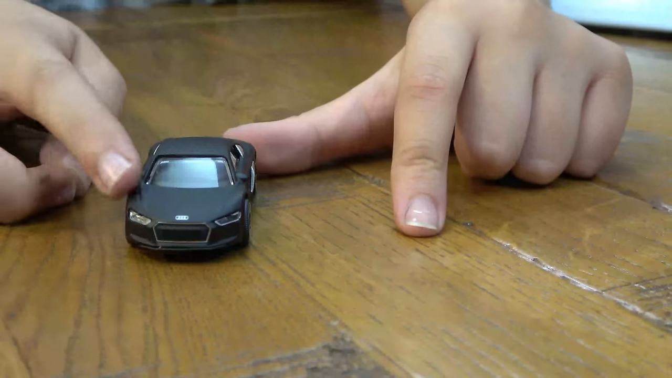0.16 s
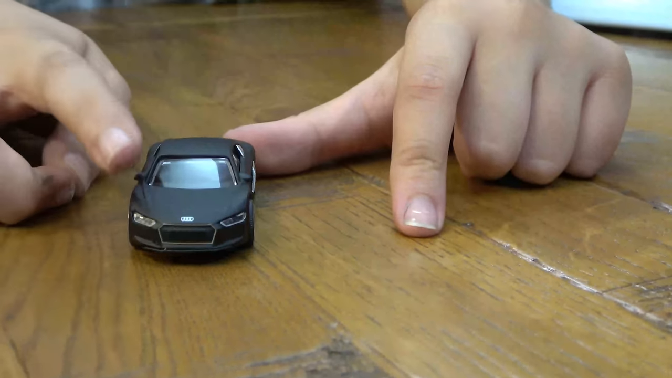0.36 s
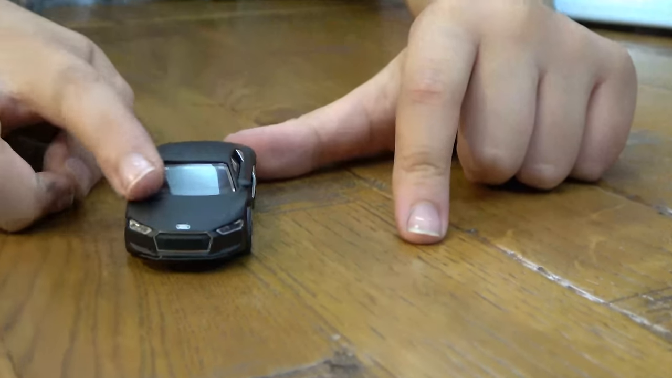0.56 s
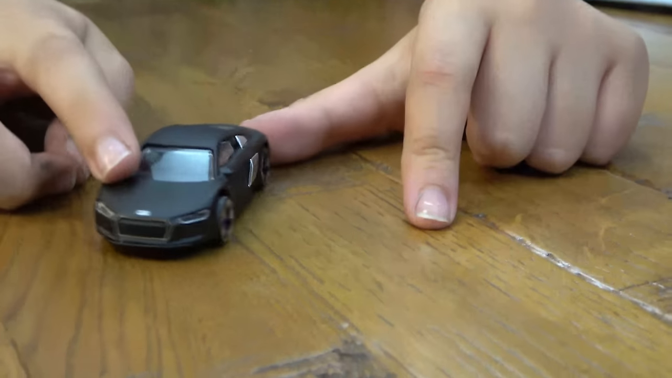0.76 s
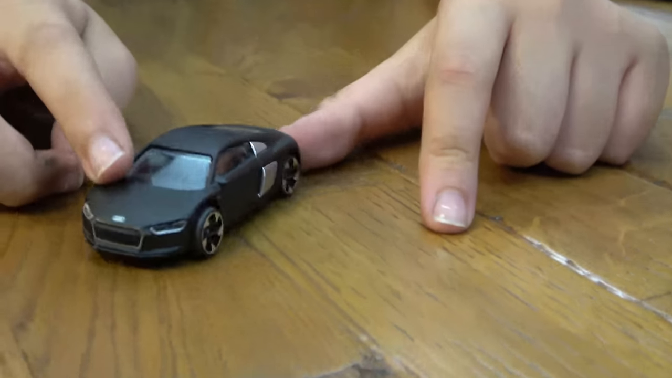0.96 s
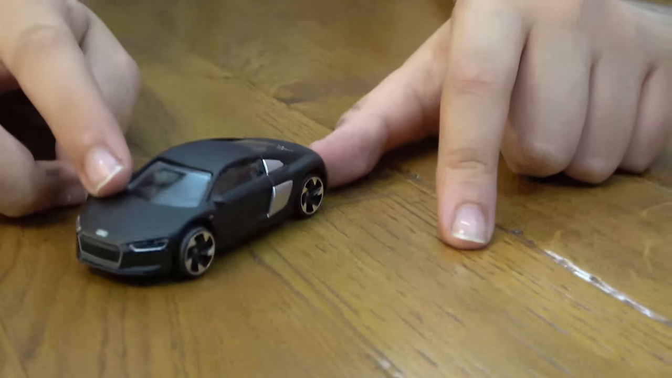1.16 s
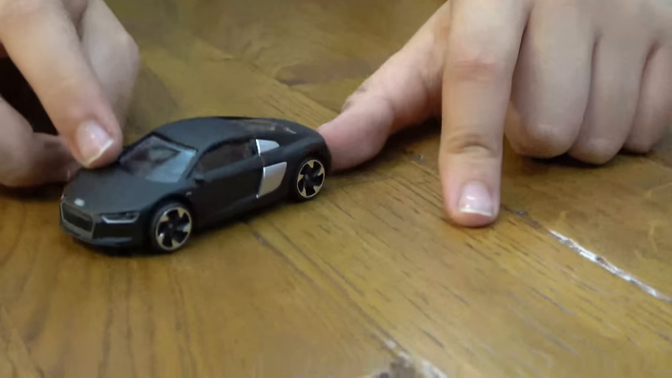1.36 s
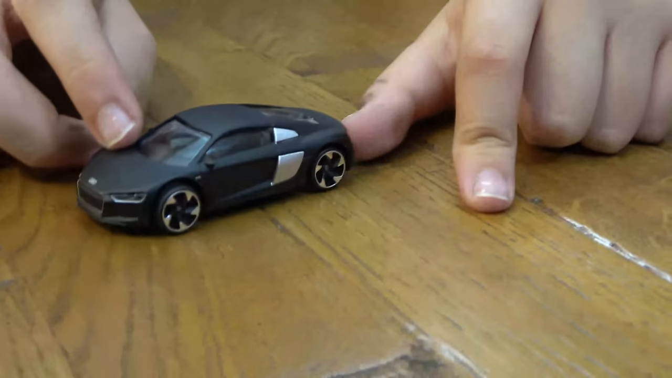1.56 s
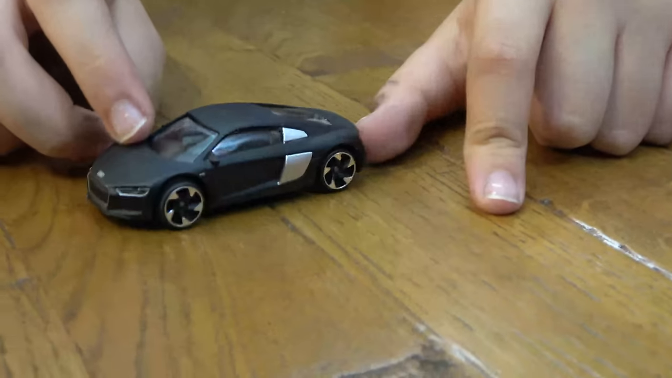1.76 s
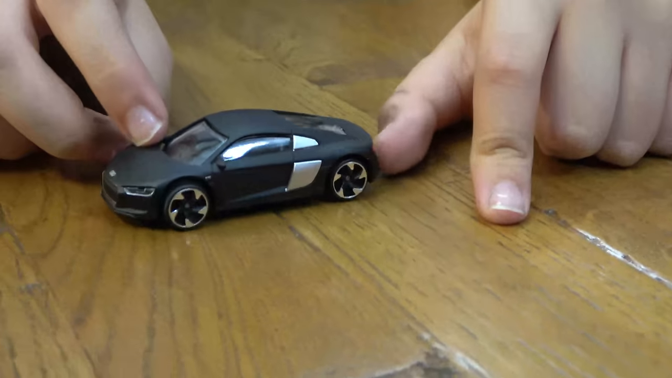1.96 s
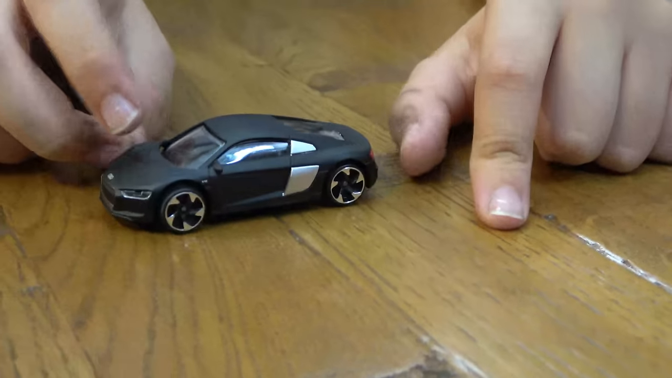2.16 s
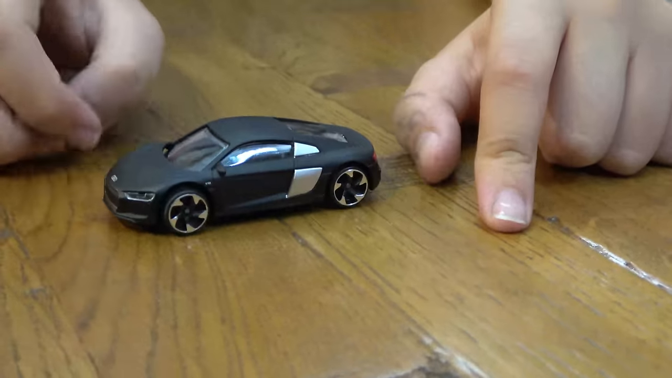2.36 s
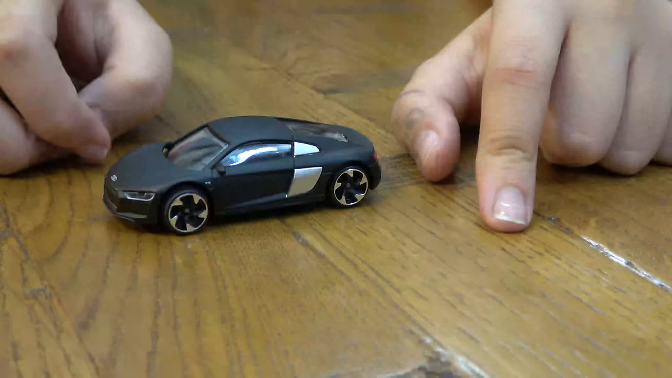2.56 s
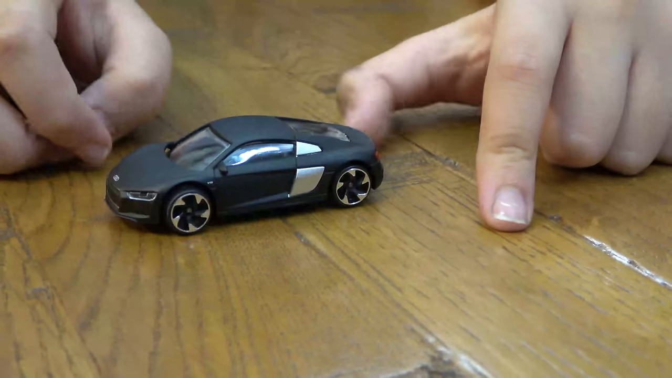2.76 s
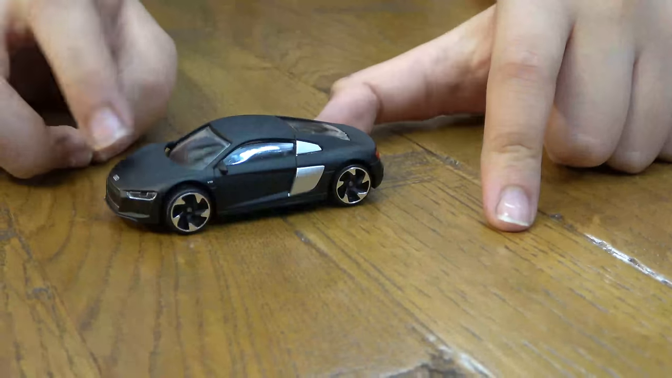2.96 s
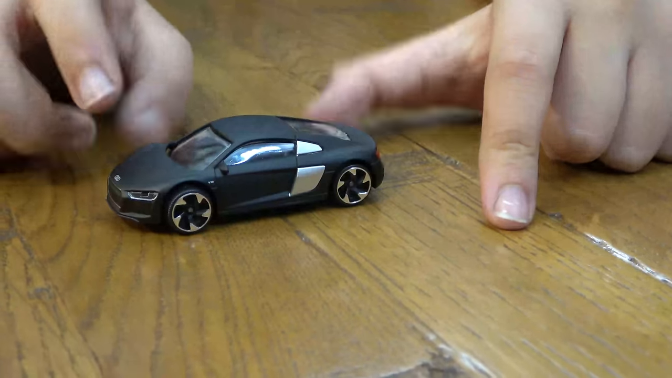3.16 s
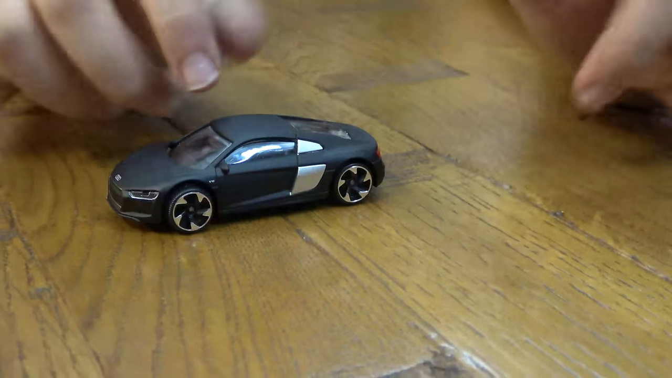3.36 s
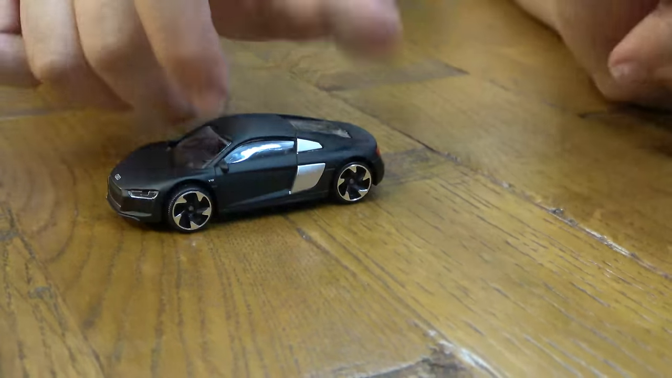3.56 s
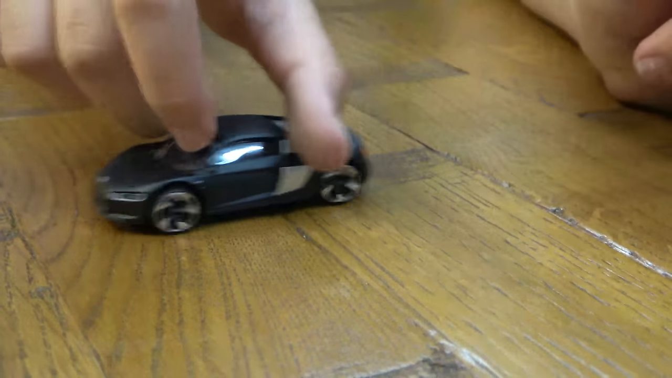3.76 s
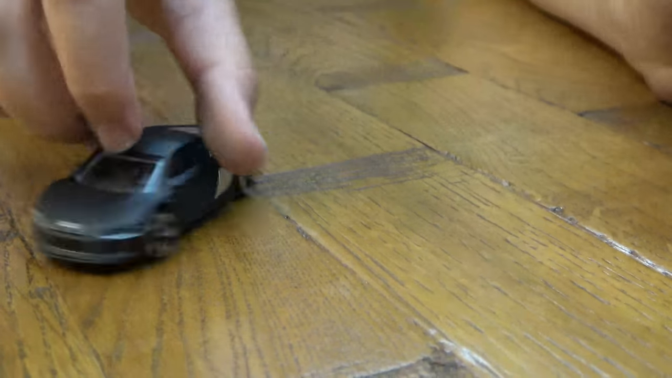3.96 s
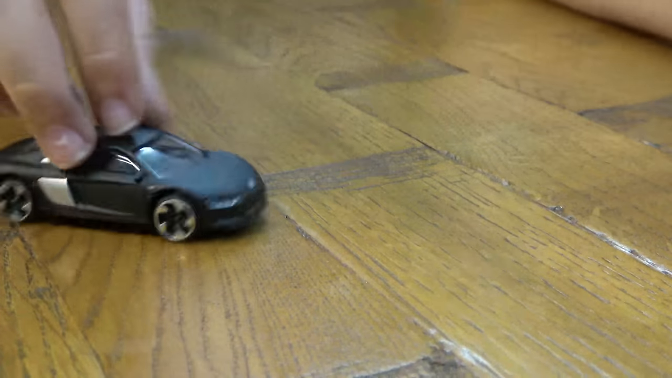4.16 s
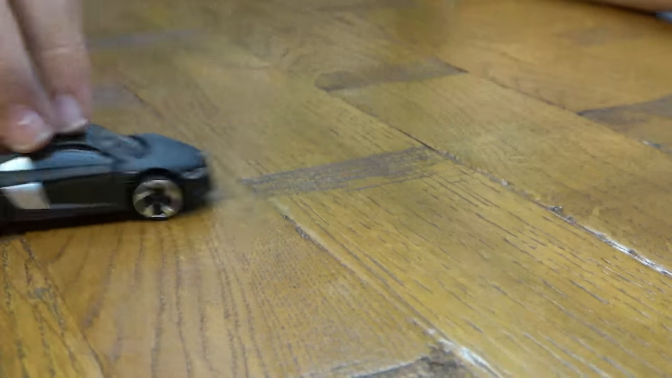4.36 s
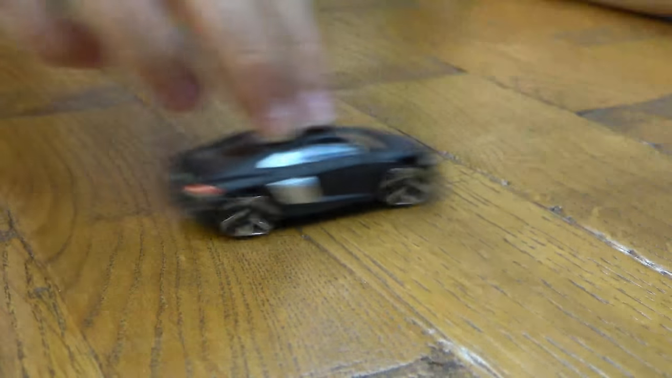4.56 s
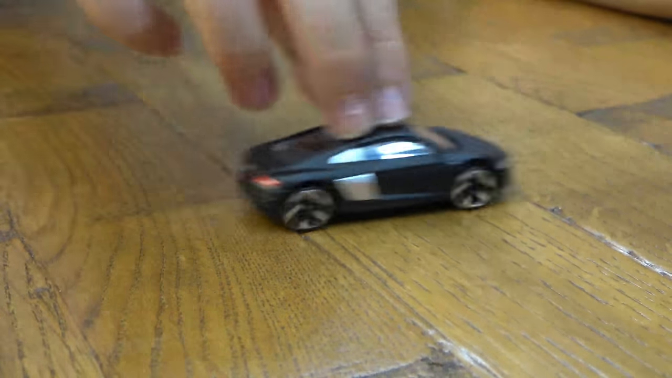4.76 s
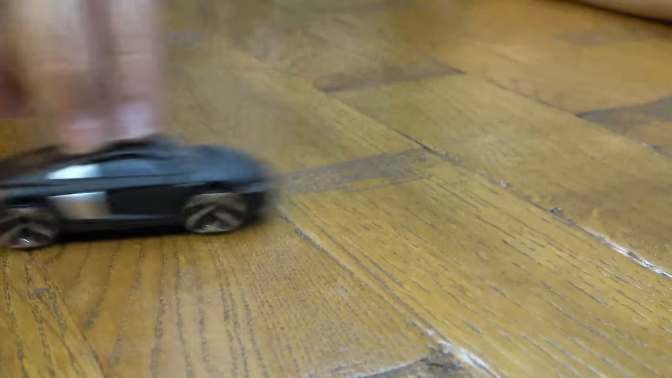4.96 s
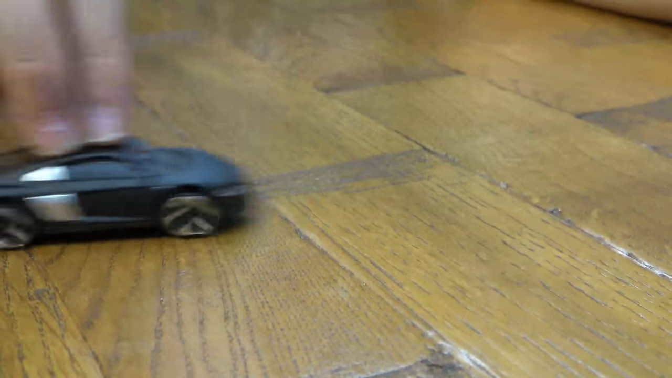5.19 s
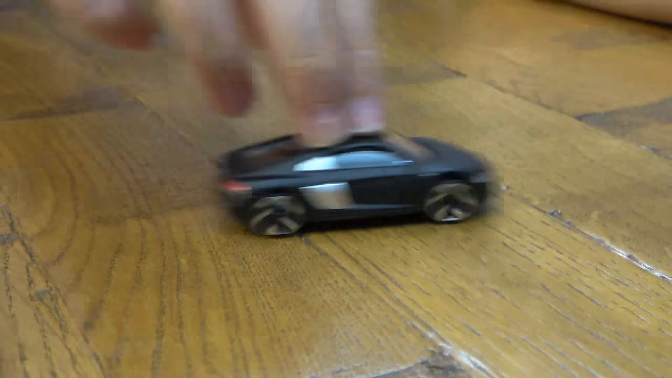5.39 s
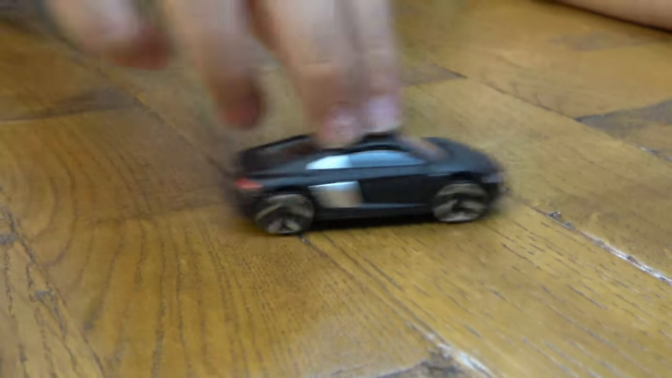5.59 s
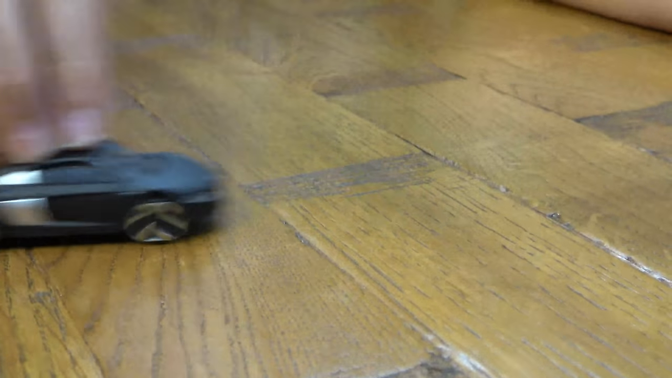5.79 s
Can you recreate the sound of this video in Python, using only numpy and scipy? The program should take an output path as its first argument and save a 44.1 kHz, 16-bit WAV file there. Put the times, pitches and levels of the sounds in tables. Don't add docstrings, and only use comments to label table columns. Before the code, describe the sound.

Quiet at first: loose axles click in a short cluster as a toy car is turned on floorboards, followed by very faint nail taps and finger rubs. Then the car is dragged round with a scrape and clatter, and rolled forward, back, forward, back in quick bright metallic rattling strokes over hollow wood. Near microphone, small dry room, low hiss.

```python
import sys
import numpy as np
from scipy import signal
from scipy.fft import rfft, irfft
from scipy.io import wavfile
from scipy.ndimage import uniform_filter1d

SR = 44100
rng = np.random.default_rng(int(sys.argv[2]) if len(sys.argv) > 2 else 0)


def persist_wave(psi):
    counts = np.round(np.clip(psi, -1, 1) * 32767).astype(np.int16)
    wavfile.write(sys.argv[1], SR, np.atleast_2d(counts).T)


def gain_from_db(level_db):
    decades = np.asarray(level_db, float) / 20
    return 10 ** decades


N = 257103


def unit(x):
    return x / np.sqrt(np.mean(x ** 2))


def colour(x, table, gain=0.95):
    hz = np.arange(x.shape[-1] // 2 + 1) * SR / x.shape[-1] + 1
    at, db = np.transpose(table)
    weight = gain_from_db(gain * np.interp(np.log(hz), np.log(at), db))
    return irfft(rfft(x) * weight, x.shape[-1])


def band(x, lo_hz, hi_hz):
    return signal.sosfilt(signal.butter(2, [lo_hz, hi_hz], "band", fs=SR, output="sos"), x)


def resonance(x, hz, width):
    return signal.lfilter(*signal.iirpeak(hz, hz / width, SR), x)


def steep_resonance(x, hz, width):
    return resonance(resonance(x, hz, width), hz, 2 * width)


def follow(x, settle_s):
    step = 1 / (settle_s * SR)
    return signal.lfilter([step], [1, step - 1], np.abs(x))


def walk(rate):
    k = int(SR / rate)
    levels = rng.standard_normal(N // 20 + 1)[:N // k + 1]
    return unit(uniform_filter1d(np.repeat(levels, k), k)[:N])


def grains(rate, spread_db, burst_s):
    when, size = rng.random((2, N))
    strength = (when < rate / SR) * gain_from_db(-spread_db * np.log(size + .03))
    envelope = signal.lfilter([1], [1, -np.exp(-1 / (burst_s * SR))], strength)
    return unit(envelope * rng.standard_normal(N))


# pitch_hz, width_hz, level_db
HUM = [(46.3, 2.1, -78), (124.6, 7.1, -75.5), (636, 115, -74.5), (754, 61, -79.5), (1004, 38, -78.5),
       (1242, 43, -85)]
# pitch_hz, level_db (per Hz)
AIR = [(20, -46), (35, -5), (60, -8), (150, -10), (300, -14), (450, -14), (900, -14.5), (1400, -25.5),
       (3100, -28.5), (4250, -34.5), (6400, -31), (16000, -37)]
# pitch_hz, level_db (per Hz)
AIR_SIDE = [(15, -56), (25, -16), (130, -3), (170, -6), (641, -5), (2050, -19.5), (4490, -24.5),
            (6050, -15), (16000, -27.5)]


def air():
    hum = np.zeros(N)
    for hz, width, db in HUM:
        hum += gain_from_db(db + 2.2 * walk(4)) * unit(steep_resonance(rng.standard_normal(N), hz, width))
    mid = hum + gain_from_db(-69.5) * unit(colour(rng.standard_normal(N), AIR))
    side = gain_from_db(-78.5) * unit(colour(rng.standard_normal(N), AIR_SIDE))
    return np.array([mid + side, mid - side])


# start_s, stop_s, level_db
LEANING = [
    (0.19, 0.636, -73),
    (1.752, 2.071, -79),
    (2.25, 3.624, -76),
    (3.67, 3.73, -72),
]


def hands():
    t = np.arange(N) / SR
    load = sum(gain_from_db(db) * (t > start_s) * (t < stop_s) for start_s, stop_s, db in LEANING)
    return uniform_filter1d(load, size=1500)


# pitch_hz, width_hz
AXLES = [(1660, 110), (2100, 15), (2640, 76), (3050, 800), (3490, 290), (4200, 46)]


def knocks(table, crack_s, shake_s, ring_db, main_db, low_hz, top_hz, level_db, crack_db, contact_s, shake=0.35):
    size = 2048
    out, t = np.zeros(N + size), np.arange(size) / SR
    for s, db, main_hz, bright_db in table:
        noise, chance = rng.standard_normal(size), rng.standard_normal(len(AXLES))
        fall = np.exp(-t / crack_s)
        snap = (1 - np.exp(-t / .0003)) * noise * (fall + 0.1 * np.exp(-t / shake_s))
        shaking = shake * np.exp(-(t / shake_s) ** (1 + shake))
        blow = (1 - np.exp(-t / contact_s)) * noise * (fall + shaking)

        ring = gain_from_db(main_db) * unit(resonance(blow, main_hz, main_hz / 18))
        for c, (hz, width) in zip(chance, AXLES):
            ring = ring + gain_from_db(3 * c) * unit(resonance(blow, hz, width))
        body = unit(blow) + gain_from_db(ring_db) * ring
        crack = band(band(snap, low_hz, top_hz), 2000, 1.2 * top_hz)
        parts = band(body, 1300, 2800), band(body, 2800, 5500), crack

        tilt_db = 15.5 * np.log2(main_hz / 2950)
        parts_db = min(-tilt_db, 0), min(tilt_db, 0), bright_db + crack_db
        i = int(s * SR)
        for part, part_db in zip(parts, parts_db):
            out[i:i + size] += gain_from_db(db + level_db + part_db) * part / np.abs(part).max()
    return out[:N]


# start_s, level_db
# (peak), pitch_hz (main mode), crack_db
TICKS = [(.558, -54.5, 3600, -24), (.6595, -45.5, 3400, 2.5), (.6713, -34, 4200, -0.5),
         (.7084, -48, 3000, -30), (.7631, -33.5, 4360, -15), (.7755, -48, 4660, -8), (.7973, -34, 4160, -1),
         (.8303, -39, 2100, -14), (.8365, -41, 2110, -2), (.8486, -33, 4450, -25), (.8636, -29, 4260, -25),
         (.868, -34, 2140, -5), (.8755, -42, 2200, -25), (.9088, -40, 1823, -13), (.918, -36.5, 4080, -25),
         (.9255, -41, 2100, -21), (.9372, -37.5, 4170, -8), (1.0437, -41.5, 1970, -34),
         (1.055, -49, 2030, -18), (1.0585, -34.5, 2060, -8), (1.0615, -29.5, 2090, -11),
         (1.0795, -41, 2970, -26), (1.268, -41, 3400, -28), (1.2865, -39.5, 3480, -23),
         (1.4306, -41.5, 3720, -3), (1.4367, -42.5, 3900, -6), (1.4432, -60, 3580, -19),
         (1.4567, -46.5, 3630, 2), (.2034, -49.5, 3420, -6)]


def axle_ticks():
    return knocks(TICKS, crack_s=.0005, shake_s=.003, ring_db=-16, main_db=7, low_hz=3400, top_hz=8000,
                  level_db=-1, crack_db=7, contact_s=.0003)


def room(x):
    t, t60_s = np.arange(16384) / SR, 0.21
    tails = rng.standard_normal((2, len(t))) * np.exp(-np.log(1000) * t / t60_s) * (t > .002)
    mid, side = (signal.fftconvolve(x, tail / np.sqrt(np.sum(tail ** 2)))[:N] for tail in tails)
    mid = colour(mid, [(200, 7), (1000, 0.0), (4500, -2.5), (14000, -14)])
    side = colour(side, [(250, -8), (600, -5.0), (2000, -22), (4500, -18.5), (7000, -4.0), (14000, -12.0)])
    return gain_from_db(-5) * (mid + gain_from_db(-1) * side * np.array([[1], [-1]]))


# start_s (fullest), fade_s, level_db, pitch_hz (centre), width_octaves
BRUSHES = [(.24, 0.02, -70, 2000, 1.4), (0.39, .04, -70, 1290, 1.4), (2.435, 0.033, -63.5, 1860, 1.45),
           (2.6, 0.025, -71, 1800, 2.7), (3.448, 0.026, -58.5, 1800, 6), (3.49, 0.034, -61, 1640, 4.2),
           (3.725, 0.025, -68, 3600, 0.9), (3.22, 0.095, -67.5, 470, 1.5), (2.83, 0.035, -71, 2000, 1.3),
           (1.17, .03, -66, 2100, 2.8), (1.62, 0.1, -76, 2600, 1.2), (2.045, 0.025, -76, 3000, 0.9),
           (0.885, 0.025, -51, 2100, 0.064)]
FLICKS = [
    (2.21, 0.094, -72.5, 4300, 0.89),
    (2.21, 0.088, -72.5, 8600, 0.36),
    (2.878, 0.078, -55, 1514, 2.34),
    (2.886, 0.024, -57, 4500, 0.95),
    (2.966, 0.034, -55, 4240, .34),
    (2.97, 0.034, -66, 8200, 0.12),
    (3.173, 0.17, -76.5, 9000, 2.5),
    (3.691, 0.011, -58, 586, 0.43),
    (2.932, 0.014, -63, 287, 0.64),
    (3.36, 0.0034, -59.5, 9600, 0.6),
]


def fingers():
    out, t = np.zeros(N), np.arange(N) / SR
    rub = grains(rate=2000, spread_db=2.5, burst_s=0.0015)
    rows = [(row[1], *row) for row in BRUSHES]
    rows += [(0.006, *row) for row in FLICKS]
    for rise_s, s, fade_s, db, hz, octaves in rows:
        near = slice(int((s - .15) * SR), int((s + .3) * SR))
        since = t[near] - s
        swell = np.where(since < 0, np.exp(-(since / rise_s) ** 2), np.exp(-since / fade_s))
        half = 2 ** (octaves / 2)
        out[near] += gain_from_db(db) * swell * unit(band(rub[near], hz / half, min(hz * half, .4 * SR)))
    return out


# pitch_hz, width_hz, level_db
BOARDS = [(72, 25, -15.5), (110, 31, -8), (134.7, 26, -2), (172.3, 16.5, 3), (202, 31, -2.5), (257, 16, -2),
          (289.6, 16, -6.5), (335, 4.7, -5), (428, 15, -10), (606, 90, -20.5)]
# start_s, pitch_hz, level_db, ring_s
THUMPS = [
    (.23, 183, -56, 0.15),
    (.83, 166, -39, 0.12),
    (.905, 153, -35, 0.073),
    (2.03, 142, -55.5, 0.15),
    (4.29, 145, -40.5, 0.32),
    (4.335, 250, -51, 0.11),
    (4.505, 85.6, -48, .15),
    (4.54, 146, -30, 0.095),
    (4.82, 162, -36.5, 0.097),
]


def boards(drive):
    def ring(x):
        return sum(gain_from_db(db) * steep_resonance(x, hz, width) for hz, width, db in BOARDS)

    push = grains(rate=300, spread_db=3.0, burst_s=0.0046)
    out = band(ring(drive * push) / np.std(ring(push)), 60, 900)
    for s, hz, db, ring_s in THUMPS:
        t = np.maximum(np.arange(N) / SR - s, 0)
        swell = (1 - np.exp(-t / 0.0094)) * np.exp(-np.log(10) * (t / ring_s) ** 2 * 10)
        out += gain_from_db(db) * np.sin(2 * np.pi * hz * t) * swell
    return out


def pushes(table, bright_db):
    t, out = np.arange(N) / SR, np.zeros((3, N))
    for start_s, fastest_s, stop_s, chatter_db, drum_db in table:
        speed = np.sin(np.pi / 2 * np.interp(t, [start_s, fastest_s, stop_s], [0, 1, 0]))
        chatter = gain_from_db(chatter_db) * speed ** 1.67
        out += [chatter, chatter * gain_from_db(bright_db) * speed ** 0.93, gain_from_db(drum_db) * speed ** 0.74]
    return out


# start_s, fastest_s, stop_s, level_db (chatter), drum_db
NUDGE = [
    (.62, .68, 0.87, -62, -61.5),
    (.74, .88, 1.014, -55, -55),
    (1.0, 1.066, 1.16, -59.5, -66),
    (1.16, 1.2, 1.49, -77, -67.5),
    (1.23, 1.29, 1.456, -73, -70),
    (1.41, 1.444, 1.545, -61.5, -66.5),
]


def nudges():
    return pushes(NUDGE, bright_db=-9)


# pitch_hz, width_hz, level_db
SHELL = [(1692, 46, -2), (2100, 48, 8.5), (2760, 160, -8.5), (3050, 1300, -0.5), (4200, 260, 0),
         (4200, 16, 2), (5660, 470, 1.5), (6800, 220, 9.5)]


def shell(x, direct):
    return direct * x + sum(gain_from_db(db) * resonance(x, hz, width) for hz, width, db in SHELL)


# pitch_hz, level_db (per Hz)
CHATTER = [(250, -69), (500, -17), (1100, -15), (1650, -11), (2100, -9), (3000, -3.5), (4200, -10.5),
           (5100, -15.5), (6500, -25.5), (9000, -64), (16000, -49)]
# pitch_hz, level_db (per Hz)
BRIGHT = [(2500, -70), (4200, -28), (6000, -3), (8500, -8), (11000, -14), (14000, -23), (17000, -30)]


def wheels():
    kicks = grains(rate=2500, spread_db=1.9, burst_s=.0015)
    sharp = grains(rate=400, spread_db=3.6, burst_s=.0008)
    chatter = unit(colour(shell(kicks, direct=0.5), CHATTER))
    bright = unit(colour(0.63 * kicks + sharp, BRIGHT))
    level, edge, drum = rolls() + nudges()
    skid, skid_edge, skid_drum = skids()
    creep = gain_from_db(-58.5) * (np.arange(N) / SR > 3.79)
    uneven = gain_from_db(1.3 * walk(40))
    lumps = gain_from_db(2.2 * walk(25))
    rattle = uneven * ((level + creep) * chatter + (edge + 0.22 * creep) * bright)
    rub = skid * chatter + skid_edge * unit(band(bright, 2100, 8300))
    return rattle, rub, (drum + skid_drum) * lumps


# start_s, level_db (peak), pitch_hz (main mode), crack_db
PINGS = [(1.0654, -41, 3000, 2), (1.0792, -47, 3000, -8), (3.801, -42, 3000, 0), (3.9385, -43, 3000, 3),
         (3.9953, -34, 3000, 0), (4.0053, -32.5, 3000, 0.5), (4.0701, -37, 2970, 0), (4.212, -35, 3000, 0),
         (4.2966, -43, 3000, 4), (4.3314, -48, 3000, -2), (4.415, -30, 3000, -6), (4.4353, -18, 3000, 0),
         (4.604, -28, 3000, -1), (4.655, -24, 3000, 0), (4.8948, -29, 3000, 0), (5.2325, -34, 3000, 0),
         (5.3253, -20, 3000, 0), (5.4174, -30, 3000, 2), (5.616, -46, 3000, -5), (5.743, -29, 3000, 1)]


def axle_pings():
    return knocks(PINGS, crack_s=0.0006, shake_s=0.0042, ring_db=-5, main_db=1, low_hz=5450, top_hz=12300,
                  level_db=-12.5, crack_db=6, contact_s=0.00027)


# start_s, level_db (peak), pitch_hz (main mode), crack_db
TAPS = [(1.8497, -47.5, 3480, -20), (1.9365, -50.5, 3570, -19), (1.988, -56, 2680, -20),
        (2.018, -47, 3440, -16), (2.041, -57, 3650, -12), (2.207, -50, 4500, -20), (2.2905, -56, 1890, -9),
        (2.8777, -64, 2090, -12), (2.8838, -46, 1580, -21), (3.218, -51.5, 3350, -10),
        (3.295, -59, 2360, -15), (3.353, -49.5, 2980, -12), (3.6647, -49.5, 3500, -22),
        (3.6985, -44, 2660, -13), (1.4, -53, 2960, -18), (1.549, -59, 1970, -25), (1.593, -59, 3540, -25),
        (1.643, -66, 2800, -25), (2.458, -59, 2000, -20), (2.689, -66, 3000, -20), (2.847, -61, 2100, -20),
        (3.34, -55, 3000, -9), (3.677, -60, 4300, -7), (3.69, -64, 5000, -10)]


def nail_taps():
    return knocks(TAPS, crack_s=0.00033, shake_s=0.0082, ring_db=-15, main_db=16.5, low_hz=4500, top_hz=7600,
                  level_db=-3.5, crack_db=10, contact_s=0.00014)


# start_s, fastest_s, stop_s, level_db (chatter), drum_db
SKID = [
    (3.76, 3.85, 3.95, -51.5, -51.5),
    (3.86, 4.1, 4.328, -38.5, -50),
]


def skids():
    return pushes(SKID, bright_db=-11)


# start_s, level_db (peak), pitch_hz (main mode), crack_db
SWING = [(3.782, -38.5, 3570, -5.5), (3.7921, -46, 1830, -16), (3.8091, -31, 3430, -15),
         (3.8288, -37, 1750, -7), (3.8383, -35.5, 3020, -8), (3.8461, -34.5, 3010, -3.5),
         (3.8511, -35, 2900, -23), (3.8764, -41, 4170, -18), (3.883, -46, 2100, -19),
         (3.9006, -45, 2080, -22), (3.9209, -38, 2600, -23), (3.9372, -32, 2080, -20),
         (3.9608, -26, 3080, -27), (3.9704, -36, 2100, -19), (3.9773, -32, 2960, -22),
         (3.9842, -32, 2010, -26), (4.0205, -29, 2820, -14), (4.0303, -28, 3450, -25),
         (4.0684, -30, 2100, -22), (4.0943, -18, 2680, -28), (4.101, -25, 2700, -9),
         (4.1178, -25, 2600, -25), (4.1223, -26, 2990, -15), (4.1629, -35, 2870, -24),
         (4.1697, -39, 2840, -24), (4.1776, -44, 3080, -23), (4.1822, -38, 3410, -20),
         (4.214, -40, 3060, -20), (4.2257, -25, 3200, -17), (4.2409, -37, 2690, -11),
         (4.2568, -44, 2600, -22), (4.2715, -31, 3480, -20), (4.2783, -38, 2730, -21),
         (4.2869, -38, 1980, -21), (4.3067, -43, 3380, -27), (4.3161, -37, 2650, -17),
         (4.3433, -35.5, 3320, -14), (4.355, -59, 3290, -22), (4.3623, -59, 2630, -20),
         (4.3902, -45, 2160, -10)]


def swing_jolts():
    return knocks(SWING, crack_s=0.0006, shake_s=0.013, ring_db=-2.0, main_db=21.0, low_hz=4740, top_hz=9000,
                  level_db=-2.0, crack_db=8, contact_s=0.00028, shake=0.27)


# start_s, fastest_s, stop_s, level_db (chatter), drum_db
ROLL = [
    (4.38, 4.57, 4.763, -32.5, -46),
    (4.77, 4.95, 5.129, -36, -44.5),
    (5.14, 5.35, 5.537, -35, -42.5),
    (5.55, 5.75, 6.14, -38, -41.5),
]


def rolls():
    return pushes(ROLL, bright_db=-11.5)


# start_s, level_db (peak),
# pitch_hz (main mode), crack_db
RIDGES = [(4.4051, -42, 1970, -20), (4.4188, -29.5, 2010, -4.5), (4.4289, -28, 2300, -9),
          (4.4457, -21.5, 4200, -4), (4.4556, -23.5, 3120, -18.5), (4.463, -25, 1940, -7),
          (4.4722, -25.5, 2130, -9), (4.4916, -36, 2910, -20), (4.5054, -24, 2270, -23),
          (4.5103, -28, 1930, -22), (4.5278, -23, 2020, -8.5), (4.5354, -22.5, 2950, -7),
          (4.5505, -24, 2100, -18), (4.558, -20.5, 2690, -11), (4.568, -21, 3120, -21),
          (4.5808, -14.5, 2870, -14), (4.5877, -20.5, 2100, -26), (4.5987, -19.5, 4270, -26),
          (4.6129, -26, 3260, -15), (4.6309, -32, 3240, -9), (4.6473, -32, 4260, -25),
          (4.6635, -19, 3000, -13), (4.6707, -35, 2900, -26), (4.6899, -36, 3200, -14.5),
          (4.7349, -46, 4170, -23), (5.1505, -47, 2610, -16), (5.1578, -44, 3200, -17),
          (5.1715, -22, 3050, -19), (5.204, -35, 3240, -26), (5.2228, -24.5, 1870, -11.5),
          (5.2399, -26.5, 1950, -16), (5.2498, -32.5, 2060, -20), (5.2655, -21.5, 1840, -3.5),
          (5.2681, -32, 2026, -8.5), (5.3258, -22.5, 2840, -27), (5.3315, -21, 3130, -20),
          (5.3467, -17, 2120, -18), (5.3719, -30.5, 4130, -7), (5.3873, -28, 2070, -15),
          (5.4, -47, 3250, -22), (5.4096, -50, 2950, -18), (5.4228, -29.5, 2640, -10),
          (5.4507, -25.5, 2120, -12.5), (5.452, -24, 2100, -15), (5.4766, -19, 2420, -17.5),
          (5.5085, -36, 2180, -26), (5.5097, -41, 2270, -27), (5.5153, -27.5, 2730, -23),
          (5.5205, -35, 3230, -23), (5.536, -37, 2930, -22),
          (4.7816, -45, 4180, -18), (4.8013, -32, 2700, -30), (4.8157, -17, 3160, -18.5),
        (4.8298, -28, 2140, -11.5), (4.832, -27.5, 4130, -24), (4.8537, -38, 2680, -30),
        (4.856, -35, 3050, -15), (4.8657, -45, 3190, -30), (4.879, -26.5, 2680, -25),
        (4.8962, -22.5, 2780, -13), (4.9101, -32, 2073, -18), (4.9216, -22, 4020, -5.5),
        (4.9272, -33, 2820, -10), (4.9394, -28, 2140, -19), (4.9519, -19.5, 4090, -17),
        (4.9646, -36, 2380, -21), (4.9718, -21, 2760, -10), (4.983, -23, 3580, -23),
        (4.9983, -35, 2150, -20), (5.0077, -28, 3240, -1), (5.0122, -26, 1970, -28),
        (5.0371, -19.5, 2740, -14), (5.0475, -27, 3300, -10.5), (5.0721, -29, 3217, -15),
        (5.088, -36, 3740, -20), (5.1129, -41, 3280, -13), (5.567, -53, 4160, -19),
        (5.5795, -66, 2030, -23), (5.5867, -57, 1960, -23), (5.5935, -60, 2830, -26),
        (5.5983, -71, 3290, -17), (5.6033, -58, 2060, -30), (5.6243, -31, 4200, -17),
        (5.6318, -29.5, 2620, -10), (5.6482, -30.5, 2040, -10), (5.6628, -25, 2034, -30),
        (5.6782, -32, 2660, -17), (5.6828, -30, 2773, -26), (5.6913, -22.5, 2060, -21),
        (5.7014, -27, 2680, -29), (5.7186, -21, 2670, -26), (5.734, -23.5, 2160, -16),
        (5.749, -18.5, 4130, -10.5), (5.7573, -23.5, 2060, -14), (5.7684, -27, 2650, -8),
        (5.7776, -27, 4140, -12), (5.7888, -21, 3050, -17), (5.8035, -22.5, 2900, -25),
        (5.8128, -19, 3030, -4), (5.8184, -20, 1950, -25)]


def ridge_jolts():
    return knocks(RIDGES, crack_s=0.001, shake_s=0.0057, ring_db=7.0, main_db=22.5, low_hz=5300,
                  top_hz=11100, level_db=-3.5, crack_db=8.0, contact_s=0.00059, shake=.6)


# pitch_hz, level_db
LEAN = [(30, -1), (70, -4), (140, -3), (300, .4), (1300, -.3), (2400, -.7), (5000, .5), (15000, .1)]


def scene():
    rattle, rub, drum = wheels()
    load = drum + hands()
    hits = axle_ticks() + nail_taps() + swing_jolts() + ridge_jolts()
    kick = gain_from_db(-17) * follow(hits, settle_s=0.0043)
    shaken = follow(hits, settle_s=.0035) + gain_from_db(-61.5)
    bunched = shaken / uniform_filter1d(shaken, size=3500)
    car = hits + axle_pings() + rub + rattle * bunched ** .6 + fingers()
    floor = boards(load * bunched ** .4 + kick)
    floor_side = gain_from_db(-20.5) * np.roll(floor, 60) * np.array([[1], [-1]])
    near = car + room(car) + floor + floor_side
    return np.array([colour(near[0], LEAN, 1.0), colour(near[1], LEAN, -1 / 2)]) + air()


def band_limit(x):
    return signal.sosfilt(signal.butter(12, 16340, fs=SR, output="sos"), x)


def record(dry):
    thin = signal.sosfilt(signal.butter(4, 42, "high", fs=SR, output="sos"), dry)
    thin = signal.sosfilt(signal.ellip(8, .2, 50, 15700, fs=SR, output="sos"), thin)
    return band_limit(thin)


dry = scene()
out = record(dry)
persist_wave(out)
```